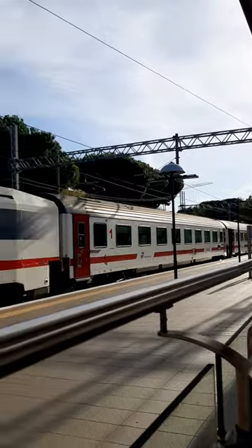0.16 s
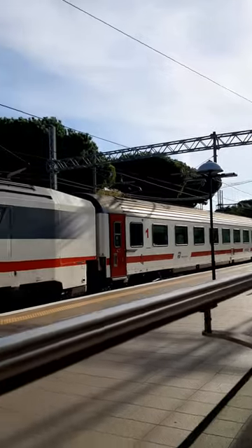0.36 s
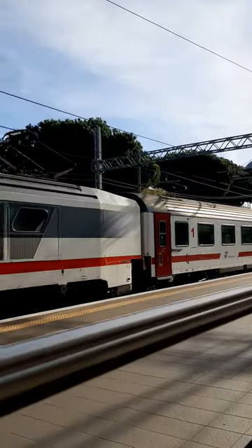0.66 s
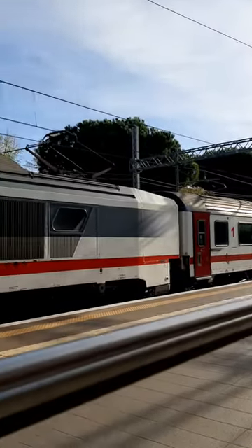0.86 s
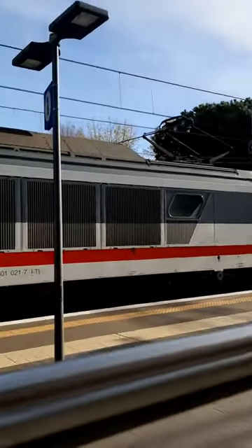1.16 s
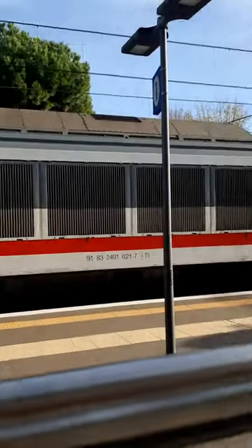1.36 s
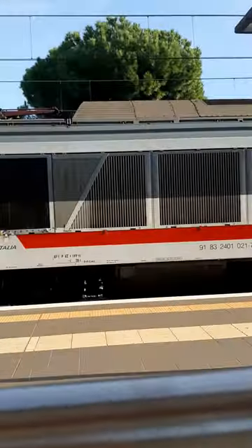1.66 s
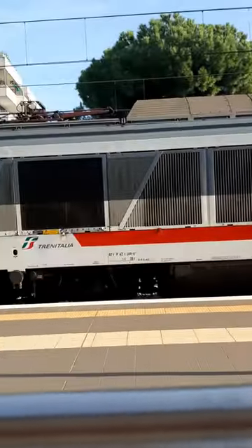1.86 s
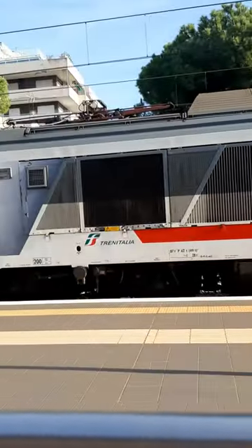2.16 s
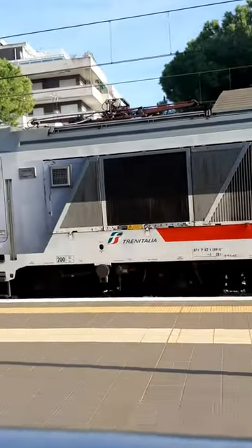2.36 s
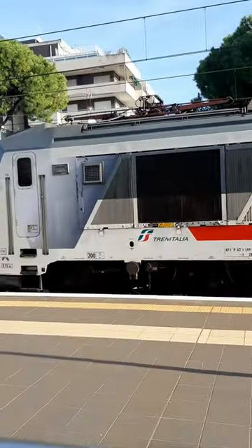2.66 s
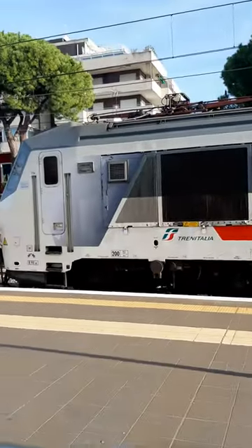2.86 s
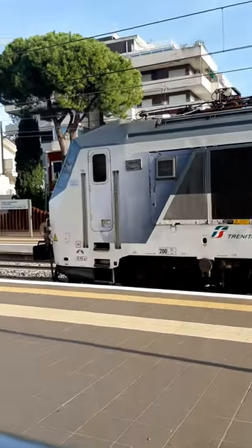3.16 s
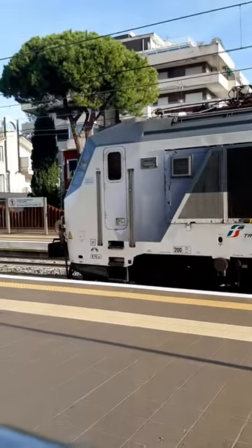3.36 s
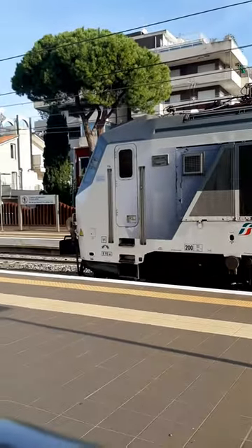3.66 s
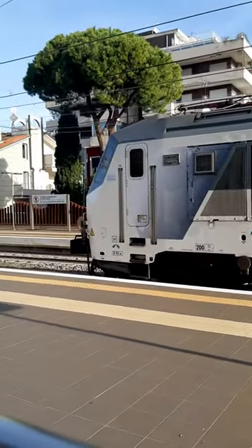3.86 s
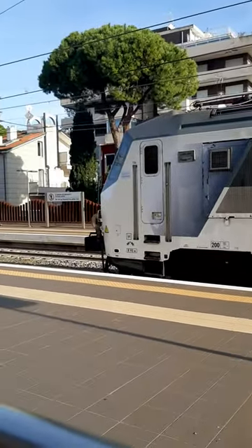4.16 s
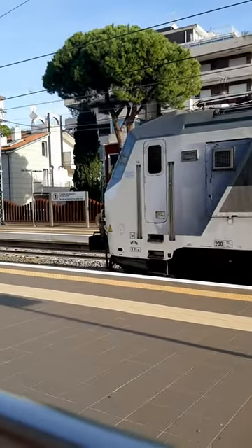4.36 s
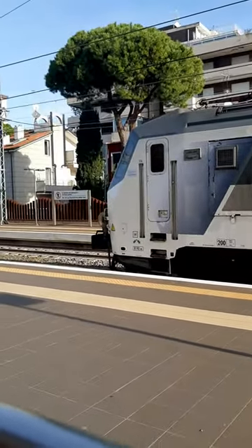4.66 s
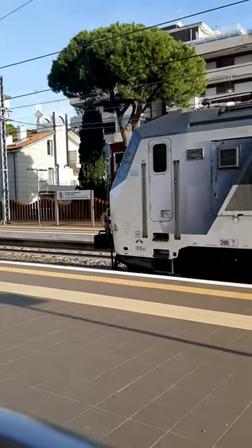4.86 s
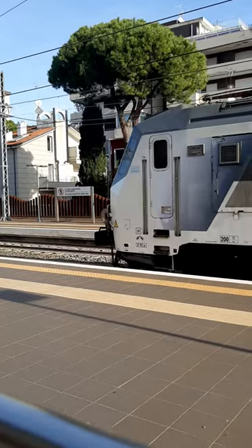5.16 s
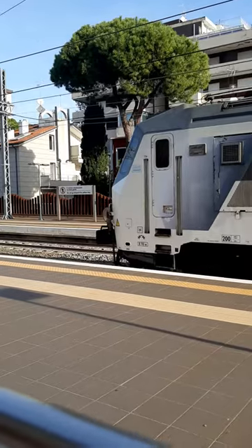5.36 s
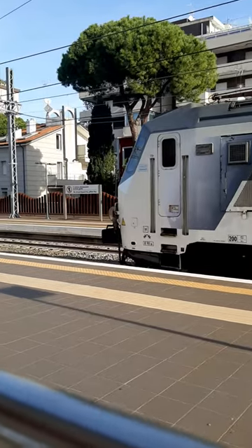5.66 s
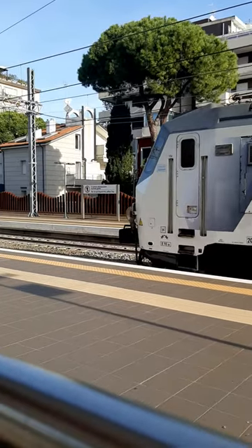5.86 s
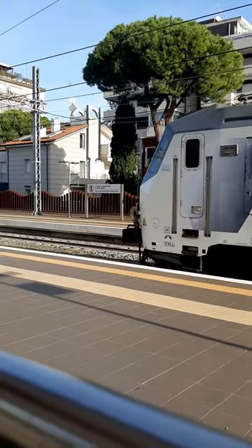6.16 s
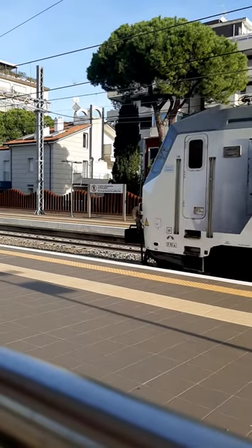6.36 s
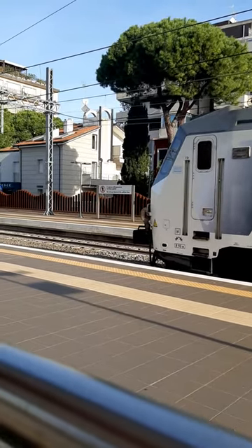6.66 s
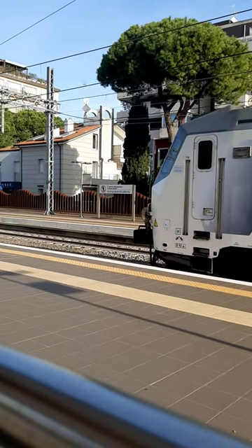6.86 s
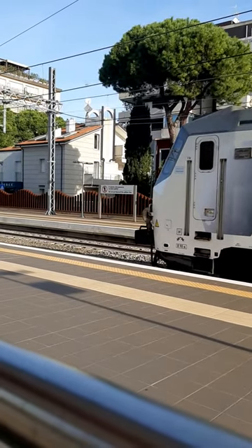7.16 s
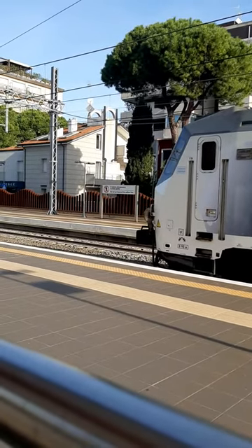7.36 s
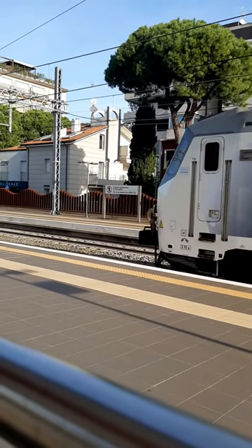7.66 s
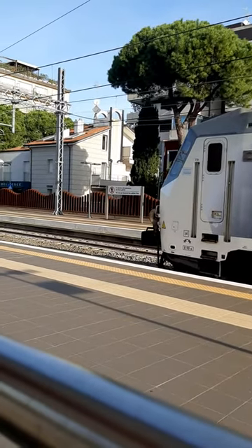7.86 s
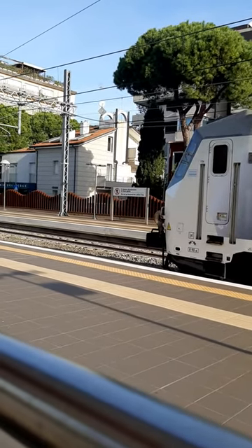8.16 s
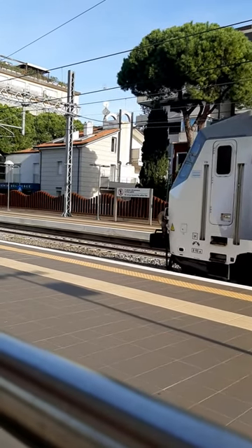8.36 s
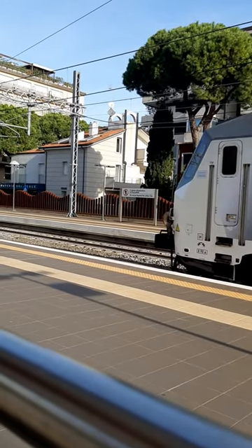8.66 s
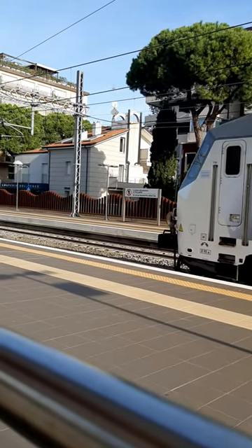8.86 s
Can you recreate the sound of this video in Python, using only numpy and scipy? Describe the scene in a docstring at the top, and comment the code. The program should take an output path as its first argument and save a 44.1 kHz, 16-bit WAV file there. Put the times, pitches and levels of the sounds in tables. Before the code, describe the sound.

A steady rush of air and a low, slightly wavering hum come from the cooling fans of an electric locomotive, heard from the platform beside it. The hum grows stronger after about a second, while a cluster of faint high whines drifts across the slowly turning microphone. A few tiny rustles and ticks sound close on the right. Late on, a brief rasping electrical chirp cuts in, leaving a thin whine over the fans.

```python
"""An electric locomotive stands at an open platform, heard through two microphone ports that slowly turn.
Turbulence from its cooling fans roars and excites duct resonances, and the blades hum at their passing
rate. Periodic switching in the converters gives clusters of thin tones about multiples of a carrier.
Tiny rustles and ticks sound close to the right port. Late on, a load switches on with a short burst."""
import sys
import numpy as np
from scipy import signal
from scipy.fft import rfft, irfft, next_fast_len
from scipy.io import wavfile
from scipy.ndimage import uniform_filter1d, map_coordinates

SR = 44100
rng = np.random.default_rng(int(sys.argv[2]) if len(sys.argv) > 2 else 0)


def pcm_store(signal):
    """Save signal as 16-bit PCM."""
    levels = np.round(np.clip(np.atleast_2d(signal), -1, 1) * 32767)
    wavfile.write(sys.argv[1], SR, levels.astype(np.int16).T)


N = 397341
T = np.arange(N) / SR


def amp(db):
    """Amplitude ratio of a level in decibels."""
    return 10 ** (np.asarray(db) / 20)


def unit(x):
    """Normalisation to an rms of 1."""
    return x / np.sqrt(np.mean(x ** 2) + 1e-20)


def spectrum_db(rows, hz):
    """Interpolation of levels over log frequency, silent outside the rows."""
    knots_hz, *columns = np.transpose(rows)
    return np.array([np.interp(np.log(hz + 1), np.log(knots_hz + 1), db, -200, -200) for db in columns])


def over_log_hz(rows, hz):
    """Interpolation of each column over log frequency, holding the end values."""
    knots_hz, *columns = np.transpose(rows)
    return np.array([np.interp(np.log(hz + 1), np.log(knots_hz), column) for column in columns])


def curves(rows):
    """Linear interpolation over time of each column after the first."""
    times, *columns = np.transpose(rows)
    return np.array([np.interp(T, times, column) for column in columns])


def wobble(rate):
    """Smooth random modulation with rate knots a second."""
    return map_coordinates(rng.standard_normal(int(N * rate / SR) + 4), [T * rate])


def patches(shape, bins, frames):
    """A random field of rms 1, correlated over frequency and time by moving averages."""
    across_frequency = uniform_filter1d(rng.standard_normal(shape), bins, axis=0)
    return unit(uniform_filter1d(across_frequency, frames, axis=1))


def filtered(x, response):
    """Linear filtering: the spectrum is multiplied by a frequency response."""
    size = next_fast_len(N + 8192)
    return irfft(rfft(x, size) * response(np.fft.rfftfreq(size, 1 / SR)), size)[..., :N]


# Rotation of the ports. Each row: time in seconds, fraction of the sweep turned.
TURN = [(0, 0.05), (1.5, 0.28), (2.5, 0.19), (4, .45), (5, 0.7), (6, .75), (7.5, 1), (9.01, 0.73)]
# Shading. Each row: frequency in Hz, left and right change over the full sweep in dB.
SHADOW = [(350, 0, 0), (550, -1, 4.5), (895, -2.5, -9.5), (1340, -2.5, 1.5), (2300, -2.5, 0), (5000, -1, 0),
          (12000, -1, -5.5)]
# Swells and dips. Each row: centre and width in seconds, centre in Hz, width in octaves, gain in dB.
SWELLS = [(4.9, 0.35, 1190, 0.19, 6), (4.9, .4, 560, 0.22, -3.5), (1.3, 0.62, 560, 0.14, -3.5),
          (2.4, 1.1, 2260, 0.31, -2.5), (8.8, .3, 7500, .3, 5), (0.68, .9, 1250, 0.083, 6),
          (3.4, .6, 1400, .2, -3), (7.5, 0.87, 2800, 0.11, 3), (1.7, 0.38, 1000, 0.26, -2)]

def shading_db(hz, times):
    """Acoustic shadow varies with the turn while bass diffracts round; single bands also swell or dip."""
    turn = np.interp(times, *np.transpose(TURN)) - .5
    shadow = over_log_hz(SHADOW, hz)[:, :, None] * turn
    bell = lambda x: np.exp(-x ** 2 / 2)
    swells = sum(db * np.outer(bell(np.log2((hz + 1) / centre_hz) / octaves), bell((times - at) / width))
                 for at, width, centre_hz, octaves, db in SWELLS)
    return shadow + swells


# Coherence. Each row: frequency in Hz, fraction of the noise power common to both ports.
COHERENCE = [(40, 1), (100, 1), (150, 0.97), (290, 0.96), (600, 0.72), (900, 0.74), (1400, 0.46),
             (3000, 0.28), (6000, 0.25), (15000, .15)]
# Drifting paths. Each row: frequency in Hz, rms phase drift between the ports in radians.
PATH_DRIFT = [(60, .01), (400, .04), (700, .3), (1000, 1.5), (3000, 2.5), (15000, 3)]
LEAD_S = .00009  # the left port is a little nearer

def turbulence(patchy_db):
    """Partially coherent noise: a common part reaches both ports by drifting paths, the rest differs."""
    hz, times, (common, *separate) = signal.stft(rng.standard_normal((3, N)), SR, nperseg=1024)
    share = over_log_hz(COHERENCE, hz).T
    drift = over_log_hz(PATH_DRIFT, hz).T * patches(common.shape, bins=6, frames=120)
    half_lead = np.pi * LEAD_S * hz[:, None] + drift / 2
    ports = np.sqrt(share) * common * np.exp([1j * half_lead, -1j * half_lead])
    ports += np.sqrt(1 - share) * np.array(separate)
    treble = (hz[:, None] / 9000) ** 2
    gain_db = patchy_db * (1 + treble) * patches(common.shape, bins=10, frames=7) + shading_db(hz, times)
    noise = signal.istft(ports * amp(gain_db), SR, nperseg=1024)[1][:, :N]
    return noise * np.sqrt(SR / 2)  # about 0 dB per Hz


# Low, middle and high air noise. Each row: frequency in Hz, left and right density in dB per Hz.
ROAR = [(22, -81, -82.5), (35, -69, -68.5), (48, -59.5, -57.5), (60, -57.5, -58.5), (100, -51.5, -50.5),
        (142, -54, -53.5), (162, -60.5, -55), (188, -54, -54.5), (258, -52, -50), (347, -47, -47.5),
        (375, -53, -51.5), (405, -54.5, -52), (420, -57, -55), (432, -55.5, -54), (485, -59, -61),
        (569, -56, -56), (603, -53.5, -53), (661, -56, -56), (690, -58.5, -60.5), (765, -60, -63.5)]
RUSH = [(765, -64.5, -63.5), (1014, -61.5, -64), (1070, -68, -68), (1456, -67.5, -69), (1501, -64.5, -61.5),
        (1693, -71, -69.5), (2080, -67, -66), (2163, -70.5, -72.5), (2720, -75.5, -73), (3160, -78.5, -78),
        (4140, -80, -80), (5270, -88.5, -87.5), (7300, -92.5, -91), (7990, -92.5, -99)]
HISS = [(8160, -92, -98), (8190, -105, -110), (8700, -113, -114), (9360, -104, -107), (10300, -101, -102),
        (11300, -96.5, -98), (12300, -97, -99), (13300, -100, -100), (14500, -104, -104),
        (15200, -106, -105), (15600, -109, -108)]

def fan_roar():
    """Turbulent flow through the fans radiates broadband noise that weakens toward the treble."""
    response = lambda hz: np.maximum.reduce([amp(spectrum_db(band, hz)) for band in (ROAR, RUSH, HISS)])
    return filtered(turbulence(patchy_db=.44), response)


# Air cavities. Each row: resonance in Hz, bandwidth in Hz, rms level in dB.
DUCT_MODES = [(55.7, 2.8, -42.5), (73, 11, -39.5), (92, 28, -37.5), (147.7, 10, -39.5), (230.8, 13, -35),
              (231, 32, -33.5), (297.2, 4, -44.5)]

def duct_drone():
    """Cavity resonance: turbulence excites a narrow band of noise about each mode."""
    def response(hz):
        power = sum(amp(db) ** 2 / width * np.exp(-np.pi * ((hz - centre) / width) ** 2)
                    for centre, width, db in DUCT_MODES)
        return np.sqrt(power)
    return filtered(turbulence(patchy_db=.37), response)


WHISTLE_HZ, WHISTLE_DB, WHISTLE_WANDER_RAD = 229, -33.5, 1.59

def duct_whistle():
    """Self-sustained oscillation: the strongest cavity locks into a tone of restless pitch and level."""
    half_lead = np.pi * LEAD_S * WHISTLE_HZ * np.array([[1], [-1]])
    phase = 2 * np.pi * WHISTLE_HZ * T + WHISTLE_WANDER_RAD * wobble(16) + half_lead
    return np.sqrt(2) * amp(WHISTLE_DB + 2.5 * wobble(12)) * np.sin(phase)


def stereo_tone(hz, left_db, right_db, lead, waver_rad):
    """Level and phase differences between the ports give a slightly wavering tone its direction."""
    phase = 2 * np.pi * (hz * T + rng.random()) + waver_rad * wobble(3)
    left = amp(left_db) * np.sin(phase + lead / 2)
    right = amp(right_db) * np.sin(phase - lead / 2)
    return np.sqrt(2) * np.array([left, right])


def swept_tone(hz, sweep, waver_rad, flutter_db):
    """Directional pickup: levels and lead follow the turn; reflections make the levels flutter."""
    turn, = curves(TURN)
    left_db, right_db, lead = (start + (end - start) * turn for start, end in np.reshape(sweep, (-1, 2)))
    left_db += flutter_db * wobble(1.953)
    right_db += flutter_db * wobble(2.01)
    return stereo_tone(hz, left_db, right_db, lead, waver_rad)


def beamed_tone(hz, beam, flutter_db):
    """Directivity: a tone is heard in narrow beams; reflections make the levels flutter."""
    left_db, right_db, lead = curves(beam)
    left_db += flutter_db * wobble(5)
    right_db += flutter_db * wobble(5)
    return stereo_tone(hz, left_db, right_db, lead, waver_rad=.1)


def fading_tones(rows, rate, direct):
    """Multipath fading: a steady direct wave interferes with random ones, separately at each port."""
    out = np.zeros((2, N))
    coarse = T[::256]
    for hz, *levels_db in rows:
        phase = 2 * np.pi * hz * T
        for port, db in enumerate(levels_db):
            knots = rng.standard_normal((2, 40)) + [[direct], [0]]
            in_phase, quadrature = (np.interp(T, coarse, map_coordinates(part, [coarse * rate]))
                                    for part in knots)
            out[port] += amp(db) * unit(in_phase * np.sin(phase) + quadrature * np.cos(phase))
    return out


# The blade tone. Each row: time in seconds, rms level in dB.
BLADE_LEVEL = [(0, -31.5), (.4, -33), (.75, -31), (1.05, -29), (1.2, -24), (1.45, -25.5), (1.8, -25),
               (2.2, -24), (2.62, -25), (2.78, -30), (3.2, -32), (3.6, -28), (3.96, -25), (4.32, -23.5),
               (4.69, -22.5), (5.05, -23.5), (5.41, -25.5), (5.77, -24), (6.13, -26), (6.49, -27),
               (6.7, -23.5), (7.21, -21), (7.93, -21.5), (8.29, -22.5), (8.5, -22), (8.7, -25.5),
               (9.01, -26)]
# Its octave comes and goes. Each row: time in seconds, gain in dB.
OCTAVE_GAIN = [(0, -2.5), (.9, -.5), (1.7, -4), (2.1, 2), (4.1, 1.5), (4.9, -5), (5.6, 1), (6.6, 2),
               (7.2, -1), (9.01, -2)]
# The octave at both ends of the sweep, in pairs: left level in dB, right in dB, left lead in radians.
OCTAVE_SWEEP = (-35, -38, -46, -41, .2, 1.2)
BLADE_HZ = 326.74

def main_fan():
    """Periodic blade passage radiates a tone at the blade rate and its second harmonic."""
    blade_db = curves(BLADE_LEVEL)[0] + 1.1 * wobble(6)
    fundamental = stereo_tone(BLADE_HZ, blade_db, blade_db, lead=.17, waver_rad=.15)
    octave = swept_tone(2 * BLADE_HZ, OCTAVE_SWEEP, waver_rad=.2, flutter_db=1.2)
    return fundamental + amp(curves(OCTAVE_GAIN)) * octave


# Its blade tone. Each row: time in seconds, left and right level in dB, left lead in radians.
SMALL_FAN_BEAM = [(0.0, -46.0, -45.0, -0.3), (0.6, -51.0, -48.0, -0.4), (1.2, -55.0, -47.0, -0.5),
                  (1.8, -59.0, -48.0, -0.2), (2.4, -47.0, -49.0, -0.7), (3.0, -45.0, -50.0, -0.7),
                  (3.6, -46.0, -50.0, -0.7), (4.2, -47.0, -55.0, -0.7), (4.81, -47.0, -44.0, -0.4),
                  (5.41, -48.0, -51.0, -1.2), (6.01, -46.0, -66.0, -1.7), (6.61, -47.0, -58.0, -2.2),
                  (7.21, -46.0, -64.0, -1.4), (7.81, -46.0, -71.0, 0.8), (8.41, -50.0, -70.0, -0.8),
                  (9.01, -46.0, -73.0, -0.2)]
# Its overtones. Each row: harmonic number, left and right level in dB.
SMALL_FAN_HARMONICS = [(2, -56, -56), (3, -65, -68)]
SMALL_FAN_HZ = 872.3

def small_fan():
    """Faster blade passage in a smaller fan gives a higher harmonic series."""
    fundamental = beamed_tone(SMALL_FAN_HZ, SMALL_FAN_BEAM, flutter_db=1)
    overtones = [(harmonic * SMALL_FAN_HZ, *levels) for harmonic, *levels in SMALL_FAN_HARMONICS]
    return fundamental + fading_tones(overtones, rate=.97, direct=1.6)


# The two strongest whines: the first upper sideband and twice the carrier.
# Each row: time in seconds, left and right level in dB, left lead in radians.
UPPER_SIDEBAND = [(0, -46, -46, 0), (.75, -49, -48, -.8), (1.3, -59, -54, -2.2), (1.75, -64, -47, -3),
                  (2.3, -50, -49, -3.4), (3.2, -49, -64, -5.8), (4.2, -49, -51, -7.1), (4.5, -50, -50, -8),
                  (4.65, -53, -45, -6.9), (4.8, -47, -43, -6.2), (5.05, -46, -42.5, -6),
                  (5.25, -50, -44, -7.1), (5.4, -47, -46, -8.4), (5.55, -44.5, -51, -9),
                  (5.75, -45, -53, -9.2), (6.8, -43.5, -50, -9.2), (8.04, -45, -53, -9.3),
                  (8.07, -37, -45, -9.4), (8.17, -38, -45, -9.3), (8.25, -44, -52, -9.2),
                  (9.01, -44, -53, -9.2)]
DOUBLE_CARRIER = [(0, -51, -46, 1.4), (.75, -53, -48, .6), (1.3, -59, -52, 2), (2.1, -59, -52, 4),
                  (2.8, -57, -64, 1), (3.3, -55.5, -58, -.8), (3.7, -59, -53, -2.6), (4.3, -57, -58, -2),
                  (4.8, -58, -52, -2), (5.6, -56, -70, -4.5), (6.05, -50.5, -62, -6.2),
                  (6.3, -51.5, -56, -6.3), (6.8, -54, -52, -6.3), (7.5, -53, -48, -6.4),
                  (9.01, -52, -55, -7)]
# Two lower sidebands. Each row: carrier multiple, offset in multiples of the output frequency.
LOWER_SIDEBANDS = [(1, -1), (2, -2)]
# Each row: one of them at both ends of the sweep, in pairs: left dB, right dB, left lead in radians.
LOWER_SWEEPS = [(-50, -54, -53, -54, 2.4, 2.3), (-59, -59, -62, -68, .6, 6)]
CARRIER_HZ, OUTPUT_HZ = 2000, 60

def converter_whine():
    """Modulation: switching puts sidebands round carrier multiples, spaced by the output frequency."""
    flutter = amp(2.5 * wobble(14))
    whine = flutter * stereo_tone(CARRIER_HZ + OUTPUT_HZ, *curves(UPPER_SIDEBAND), waver_rad=.05)
    whine += stereo_tone(2 * CARRIER_HZ, *curves(DOUBLE_CARRIER), waver_rad=.05)
    for (multiple, offset), sweep in zip(LOWER_SIDEBANDS, LOWER_SWEEPS):
        whine += swept_tone(multiple * CARRIER_HZ + offset * OUTPUT_HZ, sweep, waver_rad=.05,
                            flutter_db=2.4)
    return whine


# Six switching tones. Each row: time in seconds, left and right level in dB, left lead in radians.
BEAM_LOW = [(0, -60, -50, -1.9), (.6, -58, -49, -.9), (1.2, -55, -50, -1.2), (1.8, -54, -56, -2.2),
            (2.4, -53, -56, -4.9), (3, -57, -59, -5.4), (3.6, -53, -52, -5.3), (4.2, -55, -51, -5),
            (4.8, -54, -54, -4.5), (5.4, -52, -52, -4.7), (6, -55, -57, -5), (6.6, -52, -54, -4.9),
            (7.2, -54, -54, -4.8), (8.5, -52, -57, -4.9), (9.01, -56, -62, -4.9)]
BEAM_BELOW = [(0.0, -60.0, -61.0, 0.3), (0.6, -66.0, -61.0, 0.2), (1.2, -61.0, -64.0, 2.1),
              (1.8, -57.0, -64.0, 1.8), (2.4, -59.0, -56.0, 2.0), (3.0, -60.0, -56.0, 1.9),
              (3.6, -60.0, -62.0, 2.0), (4.2, -59.0, -60.0, -0.1), (4.81, -61.0, -66.0, -0.3),
              (5.41, -59.0, -61.0, -0.8), (6.01, -60.0, -61.0, -0.8), (6.61, -61.0, -60.0, 0.4),
              (7.21, -63.0, -58.0, -0.3), (7.81, -60.0, -59.0, -1.2), (8.41, -58.0, -63.0, -0.8),
              (9.01, -60.0, -64.0, -0.2)]
BEAM_ABOVE = [(0.0, -57.0, -62.0, 2.3), (0.6, -59.0, -63.0, 2.6), (1.2, -56.0, -66.0, 1.5),
              (1.8, -61.0, -65.0, 0.5), (2.4, -61.0, -65.0, 1.4), (3.0, -63.0, -66.0, 1.9),
              (3.6, -61.0, -63.0, 0.4), (4.2, -59.0, -59.0, 0.4), (4.81, -60.0, -59.0, 0.4),
              (5.41, -62.0, -66.0, 0.4), (6.01, -57.0, -64.0, 0.4), (6.61, -59.0, -70.0, 0.1),
              (7.21, -57.0, -71.0, 2.3), (7.81, -59.0, -69.0, 1.8), (8.41, -57.0, -66.0, 1.4),
              (9.01, -58.0, -66.0, 1.2)]
BEAM_THIRD_BELOW = [(0.0, -64.0, -66.0, 2.1), (0.6, -62.0, -62.0, 1.3), (1.2, -70.0, -64.0, 2.0),
                    (1.8, -68.0, -64.0, 2.5), (2.4, -70.0, -69.0, 0.5), (3.0, -69.0, -67.0, -0.7),
                    (3.6, -70.0, -69.0, -0.4), (4.2, -64.0, -66.0, -0.3), (4.81, -66.0, -66.0, 0.7),
                    (5.41, -68.0, -66.0, 1.1), (6.01, -71.0, -69.0, 1.1), (6.61, -67.0, -71.0, 1.0),
                    (7.21, -69.0, -72.0, 0.1), (7.81, -73.0, -70.0, 0.0), (8.41, -72.0, -71.0, 0.4),
                    (9.01, -72.0, -71.0, -0.1)]
BEAM_THIRD_ABOVE = [(0.0, -71.0, -70.0, 0.7), (0.6, -64.0, -66.0, 0.4), (1.2, -65.0, -71.0, 1.5),
                    (1.8, -67.0, -69.0, -0.5), (2.4, -64.0, -73.0, 0.5), (3.0, -69.0, -71.0, 1.2),
                    (3.6, -68.0, -74.0, -0.7), (4.2, -70.0, -78.0, -1.5), (4.81, -71.0, -78.0, 0.8),
                    (5.41, -66.0, -71.0, -0.4), (6.01, -62.0, -70.0, -0.9), (6.61, -63.0, -73.0, -0.5),
                    (7.21, -64.0, -76.0, 0.9), (7.81, -65.0, -69.0, 1.0), (8.41, -66.0, -73.0, 1.1),
                    (9.01, -64.0, -72.0, 0.8)]
BEAM_SIXTH = [(0.0, -69.0, -75.0, -1.0), (0.6, -75.0, -72.0, -0.5), (1.2, -77.0, -74.0, -2.3),
              (1.8, -72.0, -74.0, -2.3), (2.4, -72.0, -75.0, -0.1), (3.0, -72.0, -72.0, 1.2),
              (3.6, -73.0, -81.0, 0.4), (4.2, -75.0, -79.0, 0.4), (4.81, -71.0, -80.0, 0.8),
              (5.41, -67.0, -76.0, -2.2), (6.01, -67.0, -79.0, -1.1), (6.61, -77.0, -80.0, -0.3),
              (7.21, -72.0, -79.0, -1.9), (7.81, -78.0, -85.0, -2.8), (8.41, -84.0, -87.0, -2.1),
              (9.01, -81.0, -79.0, -3.5)]
# Their pitches. Each row: carrier multiple, offset in multiples of the output frequency, beam table.
BEAMS = [(1, -3, BEAM_LOW), (2, -4, BEAM_BELOW), (2, 4, BEAM_ABOVE), (3, -1, BEAM_THIRD_BELOW),
         (3, 1, BEAM_THIRD_ABOVE), (6, 0, BEAM_SIXTH)]

def converter_beams():
    """Directivity makes further switching tones rise and fall as the ports turn."""
    return sum(beamed_tone(multiple * CARRIER_HZ + offset * OUTPUT_HZ, beam, flutter_db=1.5)
               for multiple, offset, beam in BEAMS)


# Each row: carrier multiple, offset in thirds of the output frequency, left and right level in dB.
WEAK_SIDEBANDS = [(1, -10, -62, -52), (1, -5, -66, -61), (1, 9, -64, -63), (1, 15, -62, -67),
                  (2, -20, -70, -73), (2, -18, -65, -65), (2, -9, -66, -68), (2, 2, -70, -69),
                  (2, 6, -70, -72), (2, 18, -69, -65), (3, -27, -75, -71), (3, -21, -75, -73),
                  (3, -15, -72, -75), (3, -9, -75, -72), (3, -1, -75, -75), (3, 9, -83, -79),
                  (5, 3, -87, -90), (5, 27, -85, -90), (5, 33, -85, -88), (6, -39, -82, -83),
                  (6, -30, -83, -86), (6, -24, -82, -87), (6, -18, -76, -79), (6, -12, -81, -86),
                  (6, -2, -84, -86), (6, 4, -85, -89), (6, 12, -85, -86), (6, 18, -84, -85),
                  (6, 33, -84, -85), (7, 37, -84, -86)]

def converter_sidebands():
    """Multipath interference fades the weaker switching tones in and out."""
    tones = [(multiple * CARRIER_HZ + thirds * OUTPUT_HZ / 3, *levels)
             for multiple, thirds, *levels in WEAK_SIDEBANDS]
    return fading_tones(tones, rate=1.45, direct=.51)


# The second harmonic at both ends of the sweep, in pairs: left dB, right dB, left lead in radians.
CHOPPER_SWEEP = (-56, -56, -65, -59, -3, -1.5)
# The weaker harmonics. Each row: harmonic number, left and right level in dB.
CHOPPER_HARMONICS = [(1, -65.5, -65), (3, -68, -70), (4, -73.5, -77.5)]
CHOPPER_HZ = 1953.2

def chopper():
    """Periodic switching slightly below the carrier gives a harmonic series of its own."""
    second = swept_tone(2 * CHOPPER_HZ, CHOPPER_SWEEP, waver_rad=.05, flutter_db=2)
    weak = [(harmonic * CHOPPER_HZ, *levels) for harmonic, *levels in CHOPPER_HARMONICS]
    return second + fading_tones(weak, rate=1.45, direct=.51)


# Each row: centre of a rustle in seconds, width in seconds, rms level at its crest on the right in dB.
RUSTLES = [(2.07, .06, -67), (2.56, .07, -67.5), (2.93, 0.046, -64), (3.075, .06, -64), (4.05, .03, -67),
           (4.4, .12, -66.5), (4.88, 0.092, -61), (5.58, 0.079, -59)]

def rustles():
    """Amplitude modulation of top-octave noise gives brief soft hisses, mostly at the right port."""
    envelope = sum(amp(db) * np.exp(-((T - at) / (width / 2)) ** 2 / 2) for at, width, db in RUSTLES)
    top_octave = lambda hz: np.exp(-((hz - 13000) / 2500) ** 2)
    hiss = unit(filtered(rng.standard_normal((2, N)), top_octave))
    return envelope * hiss * amp([[-5], [0]])


# Each row: start of a tick in seconds, level before filtering in dB, left minus right in dB,
# frequency in Hz, phase scatter in radians.
TICKS = [(2.922, -42, -6, 7300, .4), (3.0345, -38.5, -3, 13450, 1.2), (3.0367, -37, -3.5, 12560, 1.3),
         (3.06, -50, -7.5, 13500, 1), (3.066, -46, -8.5, 13700, .8), (3.0725, -40, -11, 13500, .9),
         (3.079, -49, -8, 13990, 1.1), (3.107, -39.5, -3, 13030, 1.2), (3.117, -36.5, -8.5, 11600, 1.2),
         (3.12, -42, -6.5, 13500, 1.2)]
TICK_T60_S = .0055

def ticks():
    """Impact excitation: something small touches the housing, giving noisy, heavily damped rings."""
    out = np.zeros((2, N))
    t = np.arange(SR // 100) / SR
    for at, db, pan_db, hz, scatter in TICKS:
        envelope = amp(db + .5 - 60 * t / TICK_T60_S)
        click = envelope * np.sin(2 * np.pi * hz * t + scatter * rng.standard_normal(len(t)))
        start = round(at * SR)
        out[:, start:start + len(t)] += amp([[pan_db / 2], [-pan_db / 2]]) * click
    port_notch = lambda hz: 1 - .85 * np.exp(-((hz - 8700) / 800) ** 2)  # the ports hear little here
    return filtered(out, lambda hz: (hz > 6000) * port_notch(hz))


# Envelope of the burst. Each row: time in seconds, level in dB.
SURGE_ENVELOPE = [(8.045, -60), (8.056, -39), (8.066, -32), (8.085, -31.5), (8.1, -34), (8.135, -36),
                  (8.155, -41.5), (8.2, -44), (8.3, -55)]
# Spectrum of its noise. Each row: frequency in Hz, relative level in dB.
SURGE_SPECTRUM = [(800, -22), (1200, 1), (1550, -1), (2100, 2.5), (2600, -5), (3500, -10), (5000, -18),
                  (7000, -21), (8300, -49)]
# Each row: tone frequency in Hz, left and right dB relative to the envelope, left lead in radians.
SURGE_TONES = [(1383, -16, -8, -1.7), (1425, -13, -14, 0), (1521, -10, -5, -.9), (1718, -14, -12, 0),
               (1820, -1, -8, 1.2), (1940, -8, -11, 2), (2030, -9, -12, 1), (2180, -11, -11, -1.9),
               (2240, -9, -13, 2.6), (2300, -14, -22, 0), (2385, -15, -16, -.3), (3760, -17, -17, 0)]
SURGE_NOISE_DB = -1.5  # relative to the envelope

def load_surge():
    """Switching transient: a load comes on in a noisy burst, and tones swell with the current."""
    noise = unit(filtered(rng.standard_normal((2, N)), lambda hz: amp(spectrum_db(SURGE_SPECTRUM, hz))))
    tones = sum(stereo_tone(*tone, waver_rad=.05) for tone in SURGE_TONES)
    sounding = (T > SURGE_ENVELOPE[0][0]) * (T < SURGE_ENVELOPE[-1][0])
    return sounding * amp(curves(SURGE_ENVELOPE)) * (amp(SURGE_NOISE_DB) * noise + tones)


# The tone after the burst. Each row: time in seconds, frequency in Hz, left rms level in dB.
FALLING_TONE = [(8.2, 2137, -56.5), (8.4, 2133, -50), (8.6, 2128, -46), (8.8, 2124, -46), (9.01, 2121, -49)]

def falling_tone():
    """Frequency glide: a thin tone sinks slightly, its phase the integral of its frequency."""
    pitch_hz, left_db = curves(FALLING_TONE)
    phase = 2 * np.pi * np.cumsum(pitch_hz) / SR
    envelope = (T > FALLING_TONE[0][0]) * np.sqrt(2) * amp(left_db)
    return envelope * np.sin(phase) * amp([[0], [-15]])


def scene():
    """Superposition: the pressures of all sources add at each port."""
    cooling = fan_roar() + duct_drone() + duct_whistle() + main_fan() + small_fan()
    switching = converter_whine() + converter_beams() + converter_sidebands() + chopper()
    return cooling + switching + rustles() + ticks() + load_surge() + falling_tone()


BAND_LIMIT_HZ = 15700

def record(dry):
    """Band limiting, with a slight level flicker mainly above 8 kHz, as from audio compression."""
    hz, _, spectra = signal.stft(dry, SR, nperseg=1024)
    depth_db = .8 * np.minimum(hz[:, None] / 9000, 1) ** 2
    flicker = amp(depth_db * patches(spectra.shape[1:], bins=60, frames=9))
    flickering = signal.istft(spectra * flicker, SR, nperseg=1024)[1][:, :N]
    return filtered(flickering, lambda hz: hz < BAND_LIMIT_HZ)


dry = scene()
out = record(dry)
pcm_store(out)
```